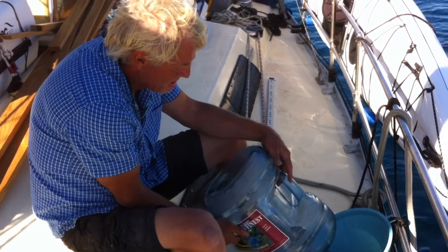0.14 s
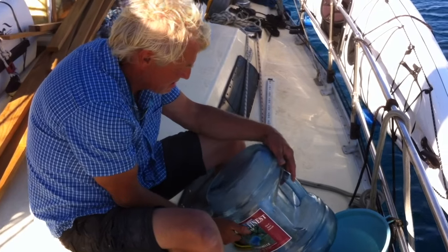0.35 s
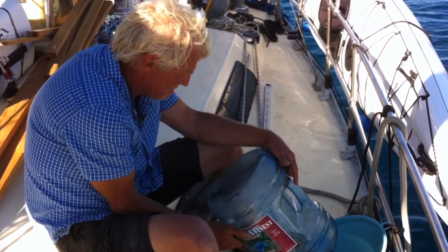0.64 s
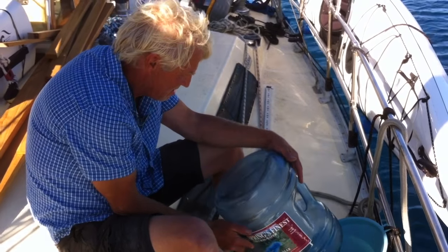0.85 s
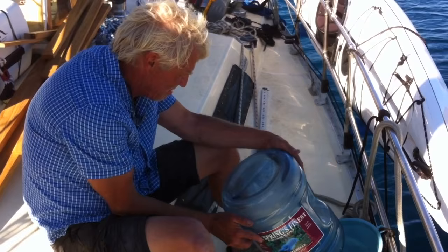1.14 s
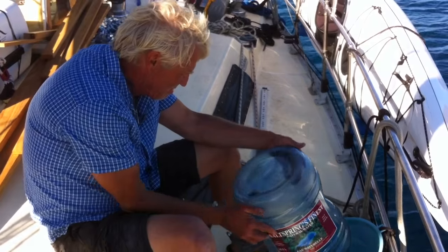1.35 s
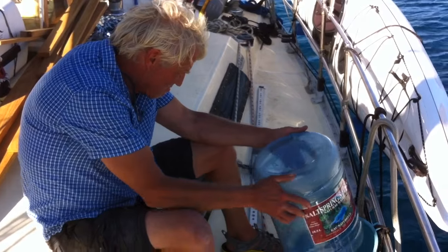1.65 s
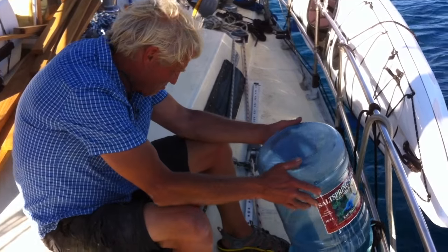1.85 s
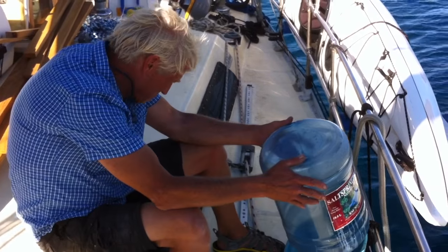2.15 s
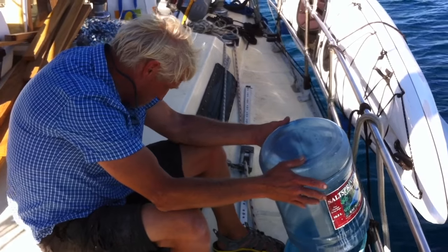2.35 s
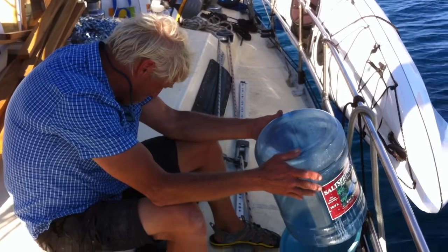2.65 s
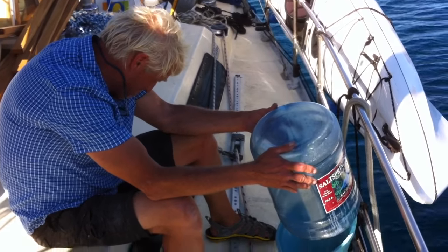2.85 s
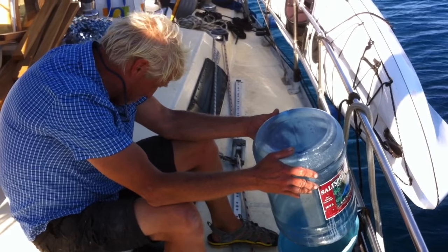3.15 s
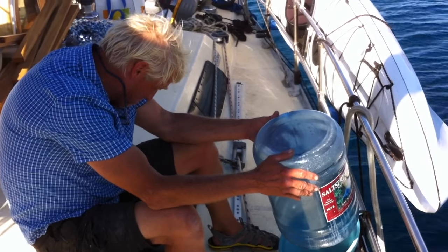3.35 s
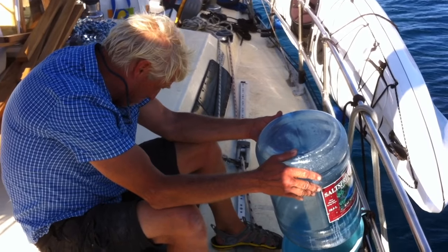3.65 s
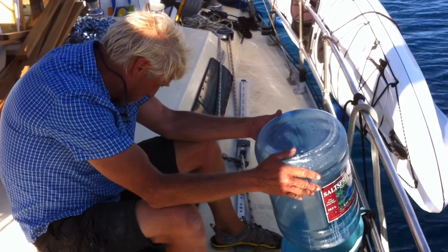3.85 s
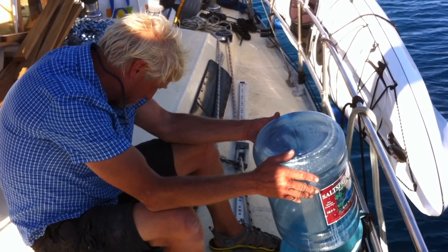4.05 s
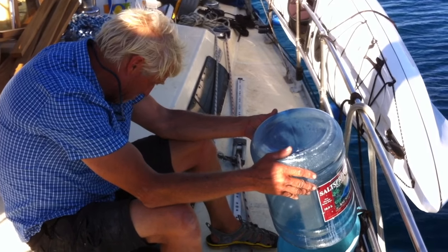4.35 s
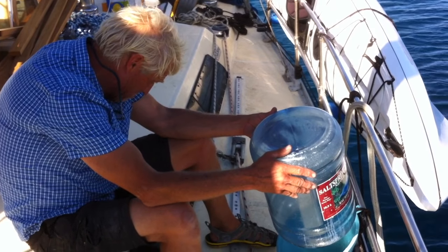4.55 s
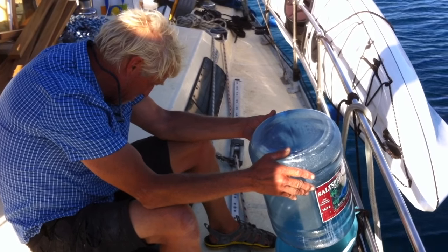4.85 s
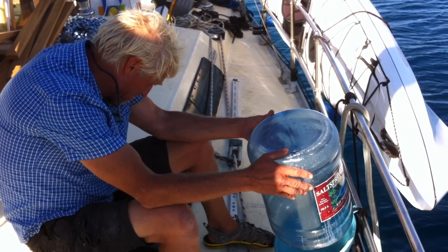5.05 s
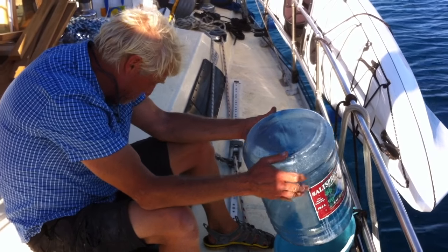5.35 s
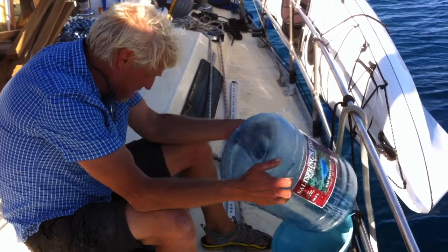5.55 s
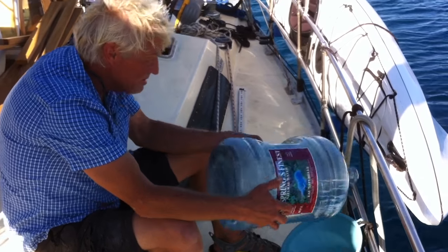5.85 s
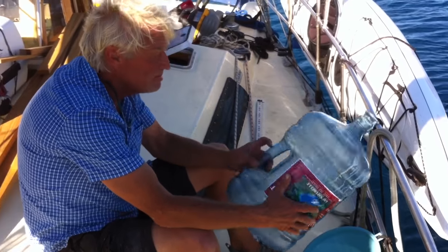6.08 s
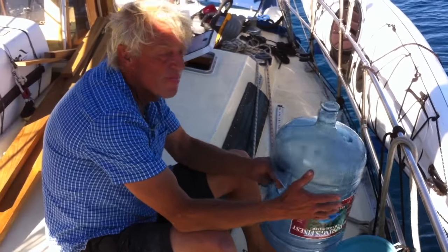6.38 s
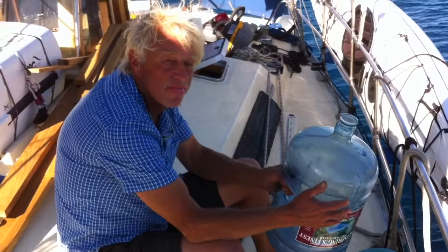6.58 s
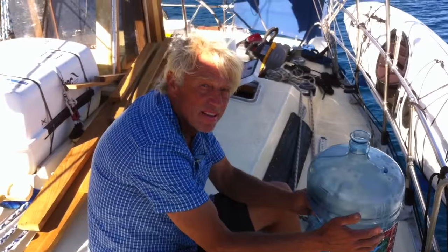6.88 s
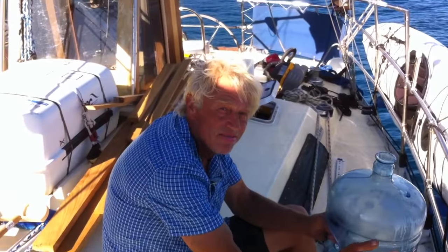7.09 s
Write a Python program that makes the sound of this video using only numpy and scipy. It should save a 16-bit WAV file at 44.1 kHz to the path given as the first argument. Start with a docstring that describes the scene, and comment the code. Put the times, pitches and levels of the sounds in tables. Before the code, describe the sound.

Irregular low gulps resonate inside a big water jug while water surges and splashes into a tub below. After the loudest gulps the pour thins quickly to pattering, a few plinks and a last trickle. The emptied jug is then handled gently, with dull little knocks and quiet sliding rustle. Near microphone, open air, short deck reflections, soft continuous water wash in the background.

```python
"""Water jug emptied on a boat

A big plastic jug is upended over a tub on the deck of a boat at rest: pitch-sagging gulps ring its modes.
Water splashes out in surges (bubble grains, slaps, spray noise), thins to a trickle, last drips.
The empty jug bumps softly (filtered noise into its modes) and is turned upright with a rustle.
A calm sea, steady coloured noise, washes behind."""
import sys
import numpy as np
from scipy import signal
from scipy.fft import rfft, irfft, next_fast_len
from scipy.io import wavfile

SR = 44100
rng = np.random.default_rng(int(sys.argv[2]) if len(sys.argv) > 2 else 0)


def master(y):
    """Save y as 16-bit WAV."""
    cut = np.clip(np.atleast_2d(y).T, -1, 1)
    pcm = np.round(cut * 32767)  # scale
    wavfile.write(sys.argv[1], SR, pcm.astype(np.int16))


N = 318402  # samples

# air gulps in the neck, before ring and small bubbles: [peak t/s, level/dB, f/Hz]
GULPS = [(0.008, -14, 200), (0.08, -17.5, 250), (0.099, -17.5, 199), (0.1365, -7.5, 360),
         (0.143, -9.5, 219.7), (0.326, -14.5, 266), (0.333, -15.5, 327), (0.344, -6.5, 226),
         (0.538, -25, 271), (0.663, -27.5, 259), (0.726, -25, 288), (0.86, -28, 189), (0.977, -18.5, 294),
         (1.005, -18, 350), (1.031, -11.5, 190), (1.267, -19, 352), (1.335, -14.5, 224), (1.529, -18, 225),
         (1.911, -17, 340), (1.921, -21, 474), (1.931, -12, 217), (2.004, -20, 207), (2.0328, -0.13, 442.6),
         (2.042, -14, 615), (2.052, -15.5, 273), (2.065, -20.5, 200), (2.148, -9.5, 467),
         (2.172, -11.5, 464), (2.193, -11, 233), (2.387, -10, 228), (2.3896, -14.5, 511),
         (2.503, -20.5, 555), (2.504, -11, 190), (2.513, -12.5, 333), (2.545, -13.5, 381),
         (2.547, -11.5, 231), (2.566, -17.5, 249), (2.647, -29.5, 188), (4.513, -35.5, 178),
         (4.567, -30.5, 262)]
# clearest bubbles and drops in the tub: [t/s, level/dB, f/Hz, t60/s]
DROPS = [(0.142, -31.5, 1884, .045), (0.199, -36, 1723, 0.11), (0.2595, -35.5, 2730, 0.02),
         (0.297, -41, 12317, .02), (0.8785, -23.5, 1960, .01), (0.949, -25.5, 2930, 0.025),
         (1.3408, -33, 1027, 0.089), (1.5974, -27.5, 1710, 0.02), (1.717, -30, 817, 0.027),
         (1.7882, -24, 1865, 0.045), (2.0437, -25.5, 2370, 0.024), (2.4099, -27.5, 4180, 0.021),
         (2.631, -28.5, 8580, 0.033), (2.669, -30, 1097, 0.029), (2.7561, -23.5, 1650, 0.0076),
         (3.0075, -35, 2530, 0.043), (3.0494, -32, 2420, 0.018), (3.1052, -31.5, 2550, 0.016),
         (3.174, -45, 13300, 0.032), (3.216, -41.5, 1387, 0.04), (3.2214, -35.5, 5420, 0.081),
         (3.9405, -42, 2261, 0.029), (3.941, -43, 4770, 0.028), (4.17, -38, 885, 0.023),
         (5.4197, -56, 5922, .016), (5.5803, -53.5, 3779, 0.054)]
# slugs of water slapping into the tub, before layer gains: [t/s, level/dB, f/Hz, length/s]
SLAPS = [(0.125, -46, 2770, 0.0057), (0.015, -44.5, 12100, 0.0062), (0.294, -49, 12500, .004),
         (0.332, -46.5, 4100, 0.0029), (0.49, -46.5, 11570, 0.019), (0.713, -49.5, 10850, 0.011),
         (0.723, -49, 5070, 0.0066), (0.783, -47.5, 4960, 0.019), (0.971, -31, 1950, 0.0073),
         (0.98, -39.5, 5740, 0.0085), (1.067, -42, 4520, 0.0072), (1.24, -43.5, 2380, 0.043),
         (1.66, -53, 4800, 0.015), (1.715, -47.5, 7460, 0.0302), (2.085, -41.5, 9060, 0.022),
         (2.189, -39.5, 1370, 0.019), (2.282, -38.5, 3370, 0.018), (2.633, -38.5, 9460, 0.0013),
         (3.02, -51.5, 2530, .025), (3.211, -55, 5800, 0.0077), (5.032, -63.5, 2300, .006)]
# soft bumps and scuffs of the nearly empty jug, led at 4.47 s by a slosh of its last water: [t/s, peak
# level/dB, contact/s]
JUG_BUMPS = [(4.471, -39, 0.02), (4.6, -55, 0.02), (4.679, -51, 0.017), (4.99, -51.5, 0.0086),
             (5.135, -54.5, 0.0076), (5.346, -57, .008), (6.354, -46, 0.0048), (6.838, -44.5, 0.0052)]
# spurts as the last water leaves the jug's shoulder: [t/s, level/dB, half length/s]
LAST_SPURTS = [(3.98, -60.5, 0.035), (4.218, -57, .055), (4.362, -58, 0.034)]
# sleeves and palms sliding, before layer gains: [t/s, rub level/dB, fine hiss level/dB, half length/s]
RUB_STROKES = [(5.72, -71, -90, .15), (6.0, -66.5, -73, 0.1), (6.21, -64.5, -82.5, 0.13),
               (6.479, -61, -76.5, 0.12), (6.8, -73, -89, .3)]
# air and wall modes of the jug: [f/Hz, level/dB, t60/s]
JUG_RESONANCES = [(126.2, -1.5, .09), (159, -17.5, .10), (176, -12.5, .12), (260, -10.5, .10),
                  (284.5, -22, 0.081), (378, -15.5, 0.18), (455, -19, 0.02), (580, -22, .05),
                  (680, -18.5, 0.019)]
# strength of the stream, as splash level before layer gains: [t/s, level/dB]
STREAM_LEVEL = [(0.0, -54.5), (0.26, -58.5), (0.66, -57.5), (0.95, -48.5), (1.15, -51.5), (1.63, -48),
                (1.81, -51), (2.0, -53), (2.19, -41.5), (2.28, -49.5), (2.43, -50), (2.51, -56.5),
                (2.77, -57), (3.16, -58), (3.34, -62), (3.72, -68.5), (4.15, -69.5), (4.4, -70.5)]
# churning in the jug: [t/s, level/dB]
CHURN_LEVEL = [(0, -32), (.45, -46), (.68, -44), (1.0, -40), (1.2, -41.5), (2.1, -40), (2.58, -53),
               (2.72, -59.5), (3.1, -75)]
# relative spectrum of the splash: [f/Hz, level/dB per Hz]
SPLASH_SPECTRUM = [(410, -38), (700, -11), (944, -11.5), (1030, -5.5), (1210, -10), (1890, -3.5),
                   (2970, -1.5), (3400, -7), (4370, -5), (5500, -11), (7000, -26), (9100, -53.5),
                   (15400, -120)]
# relative spectrum of spray and fine hiss: [f/Hz, level/dB per Hz]
SPRAY_SPECTRUM = [(3530, -30), (5600, -4), (6600, -7.5), (8890, 1), (9940, -6.5), (11900, -4),
                  (15500, -6.5)]
# relative spectrum of big bubbles in the jug: [f/Hz, level/dB per Hz]
CHURN_SPECTRUM = [(35, -58), (60, -30.5), (118, -3), (166, 0.5), (290, -3.5), (380, -10), (541, -20),
                  (822, -25.5), (900, -24), (1170, -47), (1980, -120)]
# relative spectrum of the thin stream: [f/Hz, level/dB per Hz]
TRICKLE_SPECTRUM = [(53, -61), (90, -23), (168, -1.5), (289, -5), (347, -0.5), (411, -9.5), (512, -15),
                    (664, -8.5), (883, -9), (1210, -20.5), (2000, -22.5), (2600, -20.5), (4400, -110)]
# relative spectrum of cloth and skin on plastic: [f/Hz, level/dB per Hz]
RUSTLE_SPECTRUM = [(88, -30.5), (155, -1), (207, -10.5), (255, -3), (501, -7), (1100, -7), (2000, -12),
                   (2310, -12), (7000, -26), (9100, -44), (15400, -120)]
# relative spectrum of the sea: [f/Hz, level/dB per Hz]
SEA_SPECTRUM = [(56, -48), (95, -10.5), (364, -7.5), (396, -11.5), (480, -12.5), (620, -13.5), (675, -13.5),
                (1490, -18), (2590, -23.5), (15500, -40)]

CUTOFF_HZ = 15750
SEA_DB = -68.5
# a gulp at GULP_HZ has time scale GULP_S; higher ones shorten by this power
GULP_S, GULP_HZ, GULP_SHORTENING_POWER = .0063, 228.6, 1.5
GULP_GLIDE_OCTAVES = -.25
STIR_DB, STIR_S = -11.5, .02  # big bubbles churned up by a gulp: level re gulp, spread in time
FULL_FLOW_DB = -50.5  # from here up the stream drags all the air it can under
SPRAY_DB, SPRAY_FLOW_POWER = -62, .8  # spray at full flow before layer gains; share of flow swing
TRICKLE_START_S, TRICKLE_END_S, TRICKLE_DB, TRICKLE_FADE_S = 2.7, 4.17, -61, .22


def from_db(db):
    """Decibels to gain."""
    return 10 ** (np.asarray(db) / 20)


def rms_one(x):
    """Scale to unit power."""
    return x / np.sqrt(np.mean(x ** 2) + 1e-20)


def at_hz(points, hz):
    """Read a spectrum on a log-frequency axis."""
    points = np.array(points)
    return np.interp(np.log(hz), np.log(points[:, 0]), points[:, 1])


def drift(rate_hz):
    """Smooth random wander of rms 1: noise through two equal poles, at 1/40 of SR."""
    r = np.exp(-80 * np.pi * rate_hz / SR)
    noise = rng.standard_normal(N // 40 + 2002)
    slow = signal.lfilter([1], [1, -2 * r, r * r], noise)[2000:]  # skip the settling
    return np.interp(np.arange(N) / 40, np.arange(len(slow)), rms_one(slow))


def add(out, start_s, sound):
    """Mix a sound in at a time, clipped to the scene."""
    start = round(start_s * SR)
    part = sound[max(-start, 0):max(N - start, 0)]
    out[max(start, 0):max(start, 0) + len(part)] += part


def held(start_s, end_s, fade_s):
    """Gain 1 between two times, dying away exponentially outside them."""
    t = np.arange(N) / SR
    return np.exp(-np.abs(t - np.clip(t, start_s, end_s)) / fade_s)


def curve_gain(rows, fade_s):
    """A level curve as gain per sample, fading out beyond its span."""
    s, db = np.transpose(rows)
    return held(s[0], s[-1], fade_s) * from_db(np.interp(np.arange(N) / SR, s, db))


def swell_at(s, half_s):
    """A bell-shaped swell of height 1."""
    return np.exp(-((np.arange(N) / SR - s) / half_s) ** 2)


def resonate(x, hz, t60):
    """A two-pole resonance with gain 1 on top."""
    r = np.exp(-np.log(1000) / (t60 * SR))
    zeros = np.array([1, 0, -1]) * (1 - r * r) / 2
    poles = [1, -2 * r * np.cos(2 * np.pi * hz / SR), r * r]
    return signal.lfilter(zeros, poles, x + 1e-18)


def coloured(x, colour):
    """Causal (minimum-phase) filter with the given spectrum, falling steeply past its ends; rms 1."""
    hz = np.maximum(np.arange(2049) * SR / 4096, 1)
    octaves_beyond = np.abs(np.log2(hz / np.clip(hz, colour[0][0], colour[-1][0])))
    db = at_hz(colour, hz) - 24 * np.minimum(octaves_beyond, 3)
    cepstrum = irfft(np.log(from_db(db)))
    # fold to the causal side: minimum phase
    cepstrum[1:2048] *= 2
    cepstrum[2049:] = 0
    impulse = irfft(np.exp(rfft(cepstrum)))
    return rms_one(signal.oaconvolve(x, impulse)[:N])


def hiss(colour, flutter_db):
    """Coloured noise with a restless level."""
    return coloured(rng.standard_normal(N) * from_db(flutter_db * drift(35)), colour)


def grain_cloud(colour, per_s, cycles, spread_db, clump_db=0, count=28):
    """Random impulses ringing some cycles at one of many pitches; neighbouring pitches clump; rms 1."""
    draws = rng.random((int(per_s * N / SR), 4))
    at, kind = (draws[:, 0] * N).astype(int), (draws[:, 1] * count).astype(int)
    strength_db = spread_db * np.minimum(-np.log(1 - draws[:, 2]), 3.5)
    sizes = from_db(strength_db) * np.sign(draws[:, 3] - .5)
    out = np.zeros(N)
    pitches = np.geomspace(colour[0][0], min(colour[-1][0], CUTOFF_HZ), count)
    for k, hz in enumerate(pitches):
        if k % 3 == 0:  # three pitches share a clump
            clump = from_db(clump_db * np.minimum(drift(22), 2))
        impulses = np.bincount(at[kind == k], sizes[kind == k], N)
        out += resonate(clump * impulses, hz, cycles / hz)
    return coloured(out, colour)


def ringing_bubbles(colour, share, per_s, cycles, spread_db, rise, onset_cycles):
    """Separate bubbles swell, glide up and die; share (0-1 in time) thins them; rms 1 at full rate."""
    out, low, high = np.zeros(N), colour[0][0], min(colour[-1][0], CUTOFF_HZ)
    draws = rng.random((int(per_s * N / SR), 6))
    born = draws[:, 5] < share[(draws[:, 0] * N).astype(int)]
    for when, size, strength, life, glide in draws[born, :5]:
        hz = low * (high / low) ** size
        t60 = cycles * 2 ** (2 * life - 1) / np.sqrt(hz * low)  # small bubbles last more cycles
        t = np.arange(int(min(t60, .1) * SR) + 1) / SR
        shape = np.exp(-np.log(1000) * t / t60) * (1 - np.exp(-t * hz / onset_cycles))
        wave = np.sin(2 * np.pi * hz * t * (1 + rise * glide * t / t60))
        db = spread_db * min(-np.log(1 - strength), 3.2)
        add(out, when * N / SR, from_db(db) * np.sqrt(size + .5) * shape * wave)
    return coloured(out, colour) * np.sqrt(share.mean())


def jug_ring(x):
    """The air and thin walls of the jug ring: parallel modes of alternating sign."""
    return sum(from_db(db) * resonate(x, hz, t60) * (-1) ** k
               for k, (hz, db, t60) in enumerate(JUG_RESONANCES))


def deck(x, echo_db=-15, t60=0.15):
    """A short scatter of echoes from tub, cabin side and deck: decaying noise after 4 ms."""
    t = np.arange(SR // 5) / SR
    echoes = rng.standard_normal(len(t)) * np.exp(-np.log(1000) * t / t60) * (t > .004)
    return x + from_db(echo_db) * signal.oaconvolve(x, echoes / np.linalg.norm(echoes))[:N]


def sea():
    """A calm sea's steady wash: broadband noise, slightly restless."""
    return from_db(SEA_DB) * hiss(SEA_SPECTRUM, flutter_db=1.9)


def glugs(swell=0.39, die=0.5, overtone_db=-15, ring_db=-3, snap_db=-36):
    """Each gulp swells, pinches off and rings briefly, its pitch sagging as it grows; the jug rings on."""
    out, lead_s = np.zeros(N), .02
    t = np.arange(SR // 10) / SR - lead_s
    for (s, db, hz), chance in zip(GULPS, rng.random((len(GULPS), 2))):
        age = t / (GULP_S * (GULP_HZ / hz) ** GULP_SHORTENING_POWER)
        rising = (age / (swell * np.sqrt(2))) ** 2
        dying = np.hypot(age / die, .5) - .5
        shape = np.exp(-np.where(age < 0, rising, dying))
        pitch = hz * 2 ** (GULP_GLIDE_OCTAVES * np.tanh(age * 2))
        phase = 2 * np.pi * (np.cumsum(pitch) / SR + chance[0])
        # a strongly squeezed bubble adds a brief octave
        octave = from_db(overtone_db) * shape * np.sin(2 * phase + 2 * np.pi * chance[1])
        add(out, s - lead_s, from_db(db) * shape * (np.sin(phase) + octave))
    envelope = np.abs(signal.hilbert(out, next_fast_len(N))[:N])
    # the neck spits small bubbles at every gulp
    spit_spectrum = [(600, 4.5), (1200, -7.0), (3000, -17), (6000, -35.0)]  # f/Hz, level/dB per Hz
    spit = envelope * grain_cloud(spit_spectrum, per_s=1900, cycles=16, spread_db=-1.5, count=14)
    # the water around it is stirred
    r = np.exp(-1 / (STIR_S * SR))
    spread_envelope = signal.filtfilt([1 - r], [1, -r], envelope, padtype=None)
    stir = spread_envelope * grain_cloud(CHURN_SPECTRUM, per_s=500, cycles=8, spread_db=1.5, count=12)
    return out + from_db(ring_db) * jug_ring(out) + from_db(snap_db) * spit + from_db(STIR_DB) * stir


def pour(thinning=.7, surge_db=1.5, bubbles_db=0, foam_db=-.5, wash_db=-9, droplets_db=3, mist_db=-7):
    """Big bubbles churn in the jug; the falling water breaks into ringing bubbles, foam and spray."""
    splash = curve_gain(STREAM_LEVEL, fade_s=.16)
    flow = splash / from_db(FULL_FLOW_DB)
    spray = from_db(SPRAY_DB) * flow ** SPRAY_FLOW_POWER
    churn = curve_gain(CHURN_LEVEL, fade_s=.5) * grain_cloud(
        CHURN_SPECTRUM, per_s=290, cycles=9, spread_db=1.5, clump_db=2.0, count=12)
    # a thin stream drags less air under: fewer bubbles, over a soft wash
    entrained = np.minimum(flow, 1) ** thinning
    bubbles = ringing_bubbles(SPLASH_SPECTRUM, entrained ** 2, per_s=650, cycles=36,
                              spread_db=4.0, rise=.02, onset_cycles=2.5)
    foam = entrained * grain_cloud(
        SPLASH_SPECTRUM, per_s=4500, cycles=45, spread_db=2.0, clump_db=8, count=36)
    wash = hiss(SPLASH_SPECTRUM, flutter_db=4.5)
    droplets = np.sqrt(entrained) * grain_cloud(
        SPRAY_SPECTRUM, per_s=2000, cycles=150, spread_db=3.8, clump_db=8.5, count=33)
    mist = hiss(SPRAY_SPECTRUM, flutter_db=3.0)
    body = from_db(bubbles_db) * bubbles + from_db(foam_db) * foam + from_db(wash_db) * wash
    fine = from_db(droplets_db) * droplets + from_db(mist_db) * mist
    return churn + from_db(surge_db * drift(18)) * (splash * body + spray * fine)


def splats(ring_cycles=4.1, patter_db=4, wash_db=-3, bubble_db=3,
           spread_octaves=0.236, bubble_t60=0.018, count=12):
    """Each slug slaps the surface and bursts into a swarm of bubbles of about one size."""
    out, t = np.zeros(N), np.arange(SR // 6) / SR
    for s, db, hz, length_s in SLAPS:
        uneven_db = patter_db * np.clip(rng.standard_normal(len(t)), -2, 2)
        patter = rng.standard_normal(len(t)) * from_db(uneven_db)
        ring_s = ring_cycles / hz
        wash = rms_one(resonate(resonate(patter, hz, ring_s), hz, ring_s))
        shape = np.minimum(4 * t / length_s, 1) * np.exp(-np.maximum(t / length_s - .5, 0))
        add(out, s, from_db(db + wash_db) * wash * shape)
        swarm_gain = from_db(db + bubble_db) * np.sqrt(2 * length_s / bubble_t60)
        for late, octaves, size in zip(rng.random(count), rng.standard_normal(count), rng.random(count)):
            pitch = min(hz * 2 ** (spread_octaves * octaves), CUTOFF_HZ)
            bubble = np.sin(2 * np.pi * pitch * t) * np.exp(-np.log(1000) * t / bubble_t60)
            add(out, s + 2 * length_s * late, swarm_gain * size * bubble)
    return out


def plinks(rise=.015, attack_s=.0004, tick_db=-14, tick_s=.005, tick_cycles=3.5,
           satellite_db=-11, satellite_octaves=0.22):
    """A drop splats and traps a bubble, whose pitch rises as it dies, and a few weaker ones."""
    out, t = np.zeros(N), np.arange(SR // 6) / SR

    def bubble(hz, t60):
        """A decaying sine with a soft attack and a slight upward glide."""
        pitch = hz * (1 + rise * (np.minimum(t / t60, 1) - .2))
        shape = np.exp(-np.log(1000) * t / t60) * (1 - np.exp(-t / attack_s))
        return np.sin(2 * np.pi * np.cumsum(pitch) / SR) * shape

    for s, db, hz, t60 in DROPS:
        ring_s = tick_cycles / hz
        noise = rng.standard_normal(len(t))
        tick = rms_one(resonate(resonate(noise, hz, ring_s), hz, ring_s)) * np.exp(-t / tick_s)
        add(out, s, from_db(db) * (bubble(hz, t60) + from_db(tick_db) * tick))
        late_s = rng.uniform(0.0015, .014, size=3)
        for late, octaves in zip(late_s, rng.normal(0, satellite_octaves, size=3)):
            satellite = bubble(min(hz * 2 ** octaves, CUTOFF_HZ), 0.019)
            add(out, s + late, from_db(db + satellite_db) * satellite)
    return out


def trickle():
    """The last thin stream patters steadily into the tub, with a few spurts as it ends."""
    level = from_db(TRICKLE_DB) * held(TRICKLE_START_S, TRICKLE_END_S, TRICKLE_FADE_S)
    level = level + sum(from_db(db) * swell_at(s, half_s) for s, db, half_s in LAST_SPURTS)
    patter = grain_cloud(TRICKLE_SPECTRUM, per_s=2600, cycles=16, spread_db=3.0)
    wash = hiss(TRICKLE_SPECTRUM, flutter_db=3.0)
    return level * (from_db(-0.5) * patter + from_db(-5.0) * wash)


def bumps(low_hz=160, soft_hz=330, scuff_db=-12):
    """Palm and deck nudge the jug, and its last water sloshes once: a soft, scuffing contact into its modes."""
    out, t = np.zeros(N), np.arange(SR // 4) / SR
    softness = signal.butter(2, [low_hz, soft_hz], "band", fs=SR, output="sos")
    for s, db, contact_s in JUG_BUMPS:
        scuff = rng.standard_normal(len(t)) * t * np.exp(-t / contact_s)
        contact = signal.sosfilt(softness, scuff)
        thud = jug_ring(contact) + from_db(scuff_db) * contact
        add(out, s, from_db(db) * thud / np.abs(thud).max())
    return out


def rustle(wall_hz=2300, wall_t60=0.008, rasp_db=-2, pressed_db=-58, uneven_db=1.5):
    """Cloth and skin slide unevenly over the plastic; under pressure tiny slips make the wall rasp."""
    rub = sum(from_db(db) * swell_at(s, half_s) for s, db, _, half_s in RUB_STROKES)
    rub = rub * from_db(uneven_db * drift(7.5))
    fine = sum(from_db(db) * swell_at(s, half_s) for s, _, db, half_s in RUB_STROKES)
    slips = rng.standard_normal(N) * (rng.random(N) < 350 / SR)  # 350 per s
    # rasp grows faster than the rub
    rasp = rms_one(resonate(slips, wall_hz, wall_t60)) * np.sqrt(rub / from_db(pressed_db))
    grain = grain_cloud(RUSTLE_SPECTRUM, per_s=3000, cycles=16.4, spread_db=2.0, clump_db=6.5, count=21)
    cloth = from_db(3.5) * hiss(RUSTLE_SPECTRUM, flutter_db=1.0) + from_db(1.0) * grain
    fine_hiss = fine * from_db(6.5) * hiss(SPRAY_SPECTRUM, flutter_db=1.5)
    return rub * (cloth + from_db(rasp_db) * rasp) + fine_hiss


def scene():
    """Water, with deck echoes, and dry trickle and handling over a calm sea."""
    water = deck(glugs() + pour() + splats() + plinks())
    return (sea() + water + trickle() + bumps() + rustle())[None]


def record(dry):
    """The microphone drops the deep bass; the top is cut."""
    bass_cut = signal.butter(2, 52, "high", fs=SR, output="sos")
    top_cut = signal.ellip(10, .2, 80, CUTOFF_HZ, fs=SR, output="sos")
    return signal.sosfilt(top_cut, signal.sosfilt(bass_cut, dry))


dry = scene()
out = record(dry)
master(out)
```